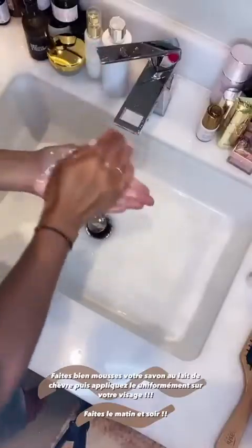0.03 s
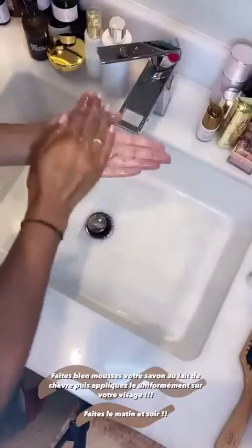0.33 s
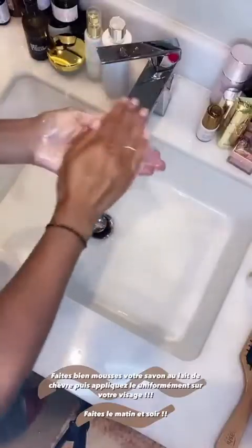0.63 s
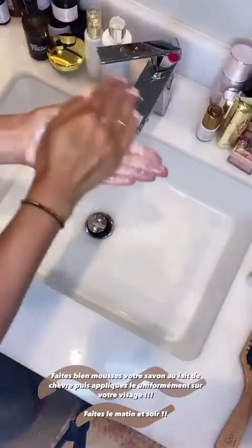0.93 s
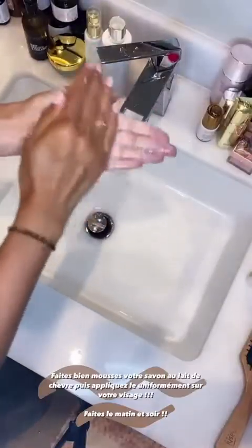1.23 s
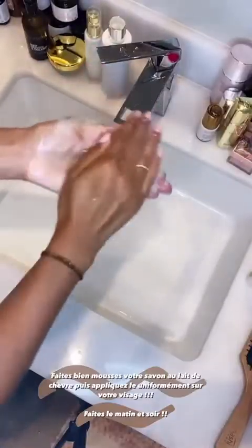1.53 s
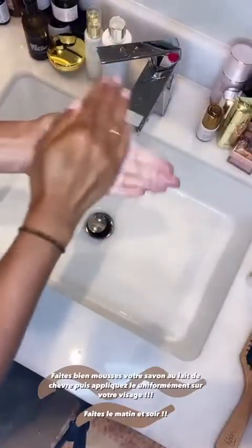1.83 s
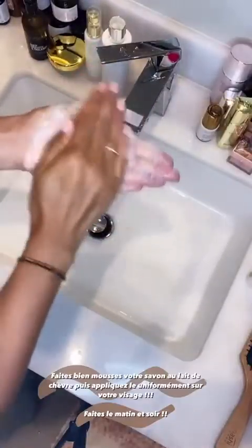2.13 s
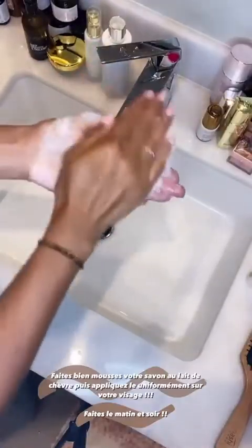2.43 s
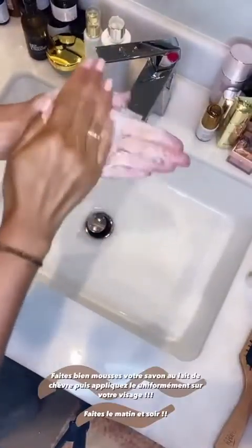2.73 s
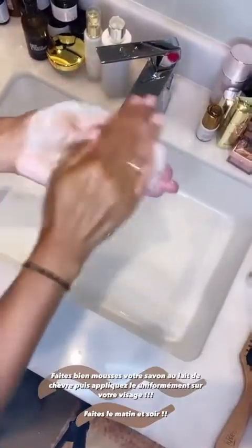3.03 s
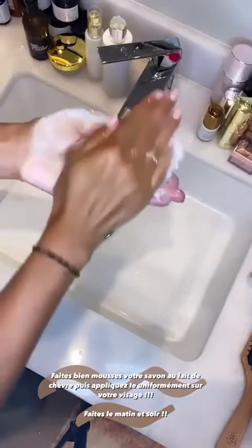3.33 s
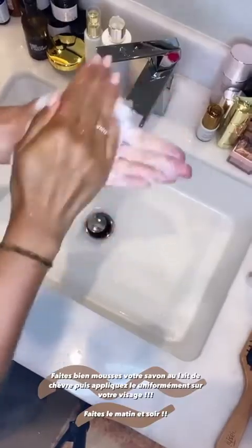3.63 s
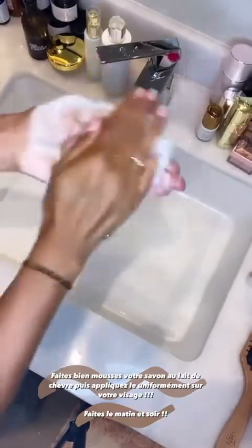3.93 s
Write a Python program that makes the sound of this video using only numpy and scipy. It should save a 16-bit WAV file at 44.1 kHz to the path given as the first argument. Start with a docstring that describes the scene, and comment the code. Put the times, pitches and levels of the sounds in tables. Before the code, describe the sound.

Wet, soapy hands rubbing together with quick squelches and crackling foam.

```python
"""Soapy hands rubbing over a bathroom sink, close to the microphone, about five strokes a second.
After a brief cut to silence the palms start to squelch, each stroke an air pocket gulping out through
crackling lather. In between, foam spits, bubbles pop and wet skin slides. The sound cuts out at 1.4 s,
the palms puff softly at 2.1 s, it cuts out again at 2.8 s, and air squeaks between the late strokes.
All along, the bowl and the hard little room ring over a low hum."""
import sys
import numpy as np
from scipy import signal
from scipy.fft import rfft, irfft, next_fast_len
from scipy.io import wavfile
from scipy.ndimage import map_coordinates

SR = 44100
rng = np.random.default_rng(int(sys.argv[2]) if len(sys.argv) > 2 else 0)


def wav_record(signal):
    """Record a signal, one row per channel, as 16-bit PCM in the file named by sys.argv[1]."""
    frames = np.transpose(np.atleast_2d(signal))
    bounded = np.clip(frames, -1, 1)
    # unit amplitude maps onto the largest positive 16-bit level
    quanta = np.round(bounded * 32767).astype(np.int16)
    wavfile.write(sys.argv[1], SR, quanta)


N = 176400
TOP_HZ, GRAINS_PER_S = 14100, 5000

# spectrum of coarse foam bursting (frequency [Hz], gain [dB])
CRACKLE_COLOUR = [(400, -24.5), (1000, -1), (1600, 1.5), (2800, 4.5), (4000, 4.5), (5000, -7), (6500, -4),
                  (12000, -69)]
# loudness of the rubbing skin (time [s], relative level [dB])
SLIDE_LEVEL = [(0, -48.5), (.3, -56), (.7, -58), (1.1, -60.5), (1.35, -60.5), (1.6, -57.5), (2.2, -50.5),
               (2.75, -50.5), (3.07, -48.5), (3.28, -54), (3.7, -53), (3.86, -46), (3.93, -55), (4, -46.5)]


def squelches():
    """Closing palms force out air at a rising pitch: gives the gulps and (crackle, fizz) envelopes."""
    # (time [s], rise [s], relative gulp [dB], pitch [Hz], relative crackle [dB], relative fizz [dB])
    strokes = [ (.187, 0.02, -34, 772, -35.5, -45), (.403, 0.018, -35.5, 800, -46.5, -49),
               (.605, 0.025, -34.5, 690, -42, -40), (.807, 0.018, -33, 747, -38.5, -42),
               (.998, 0.0111, -36, 700, -39, -47.5), (1.200, 0.0095, -36, 740, -42.5, -52),
               (1.400, 0.0089, -40.5, 1000, -38.5, -47), (1.516, 0.013, -34.5, 680, -41, -45.5),
               (1.712, 0.0073, -35, 603, -34.5, -45), (1.922, 0.009, -33, 930, -33, -37.5),
               (2.096, 0.0037, -38, 700, -40.5, -44), (2.119, 0.018, -36.5, 940, -35, -43.5),
               (2.301, 0.0062, -34, 890, -41, -41.5), (2.508, 0.0056, -33.5, 510, -45, -44.5),
               (2.712, 0.016, -32.5, 643, -41.5, -54.5), (3.020, 0.011, -32, 544, -39, -45.5),
               (3.222, 0.032, -37, 840, -53, -61.5), (3.626, 0.0053, -34, 897, -41, -48.5),
               (3.801, 0.013, -34.5, 637, -38, -45), (3.815, 0.0089, -40, 735, -39.5, -46.5),
               (3.996, 0.015, -33, 655, -37, -39)]
    # spectrum of the wet slush around a gulp (frequency [Hz], gain [dB])
    slush_colour = [(120, -49), (280, -12), (410, 0.5), (680, 2), (1080, -4), (1400, -4), (2200, -8.5),
                    (4000, -49.5), (8000, -94)]
    lag_s, glide_per_s, small_pocket_hz = 0.00215, 14.2, 1015
    tone, slush, crackle, fizz = np.zeros((4, N))
    for at, rise, gulp_db, hz, crackle_db, fizz_db in strokes:
        near = slice(max(0, int(at * SR) - SR // 8), int(at * SR) + SR // 4)
        t = clock()[near] - at
        gulp_t = t - lag_s
        phase = 2 * np.pi * (hz * (gulp_t + glide_per_s * gulp_t ** 2 / 2) + rng.random())
        pockets = np.sin(phase) + amp(-7) * np.sin(phase * small_pocket_hz / hz)
        tone[near] += amp(gulp_db) * swell(gulp_t, rise=0.0032, fall=0.0028) * pockets
        opening = np.clip((t + 1.1 * rise) / 0.0017, 0, 1)
        slush[near] += amp(gulp_db) * opening * swell(gulp_t, rise, fall=0.0084)
        crackle[near] += amp(crackle_db) * opening * swell(t, 0.68 * rise, fall=0.0046)
        lingering = amp(-15.5) * swell(t, rise=0.0014, fall=0.058)
        fizz[near] += amp(fizz_db) * opening * (swell(t, 0.38 * rise, fall=0.0046) + lingering)
    gulps = amp(-0.5) * tone + amp(-6) * slush * grains(slush_colour, GRAINS_PER_S, spread_db=3.5)
    return gulps, np.array([crackle, fizz])


def lather(crackle, fizz):
    """Coarse and fine foam burst under two envelopes; the top sparkle dulls as the soap thickens."""
    # spectra of fine foam and of thin, wet soap (frequency [Hz], gain [dB])
    fizz_colour = [(2000, -44), (4200, -4), (5100, -6.5), (5900, 1.5), (7500, -0.5), (9500, -7),
                   (12000, -13.5), (14000, -24)]
    sparkle_colour = [(5000, -31), (8000, 2), (11000, -1.5), (14000, -14.5)]
    dulling_db_per_s = 8
    sparkle = amp(-3 - dulling_db_per_s * clock()) * grains(sparkle_colour, GRAINS_PER_S, spread_db=9.5)
    coarse = amp(-4) * foam(CRACKLE_COLOUR, spread_db=10.5)
    fine = amp(-3) * foam(fizz_colour, spread_db=11)
    return crackle * coarse + fizz * (fine + sparkle)


def foam(colour, spread_db, bubbles_per_s=16000, ring_s=0.001):
    """A crowd of tiny bubbles, each ringing briefly at its own pitch, rms 1."""
    start, pitch, size, phase = rng.random((int(bubbles_per_s * N / SR), 4)).T[:, :, None]
    t = np.arange(SR // 500) / SR
    rings = amp(spread_db * size) * np.exp(-t / ring_s) * np.sin(2 * np.pi * (pitch * TOP_HZ * t + phase))
    at = (start * N).astype(int) + np.arange(len(t))
    crowd = np.bincount(at.ravel(), rings.ravel(), N)[:N]
    return unit(coloured(crowd, colour))


def grains(colour, per_s, spread_db):
    """Tiny soap films burst as clicks of random size, rms 1."""
    clicks = (rng.random(N) < per_s / SR) * rng.choice([-1, 1], N)
    sizes = amp(spread_db * rng.standard_normal(N))
    return unit(coloured(clicks * sizes, colour))


def spits():
    """(Crackle, fizz) envelopes of foam tearing between fingers: sudden start, short hold, quick end."""
    # (time [s], length [s], relative crackle [dB], relative fizz [dB])
    tears = [ (0.167, 0.0054, -45.5, -55.5), (0.572, 0.018, -50.5, -64.5), (0.6, 0.0036, -73, -47.5),
             (0.385, 0.0065, -44.5, -58.5), (0.818, 0.0058, -59.5, -41), (1.163, 0.0024, -43.5, -46.5),
             (1.694, 0.0044, -40, -36.5), (1.895, 0.006, -43.5, -49.5), (1.987, 0.0052, -41.5, -57),
             (2.085, 0.0059, -37, -52.5), (2.5, 0.002, -43, -47), (2.577, 0.0032, -43.5, -52),
             (2.694, 0.0027, -42.5, -38.5), (2.727, 0.016, -47, -45.5), (2.766, 0.01, -51.5, -46.5),
             (2.927, 0.008, -30.5, -42), (3.122, 0.005, -27.5, -39.5), (3.186, 0.0046, -41, -52),
             (3.206, 0.014, -42, -44), (3.237, 0.015, -46, -45), (3.411, 0.014, -46.5, -53),
             (3.438, 0.0031, -44.5, -37), (3.443, 0.011, -43, -45), (3.598, 0.0065, -44, -49.5),
             (3.694, 0.0031, -38.5, -40.5)]
    crackle, fizz = np.zeros((2, N))
    for at, length, crackle_db, fizz_db in tears:
        shape = np.interp((clock() - at) / length, [0, 0.1, 0.87, 1.83], [0.0013, 1, 0.76, 0.00034])
        crackle += amp(crackle_db) * shape
        fizz += amp(fizz_db) * shape
    return np.array([crackle, fizz])


def pops(tiny_count=90, tiny_hz=2990, glide_per_cycle=0.026):
    """A bubble opens with a snap and rings a few cycles, gliding upward. Tiny ones burst at random."""
    # single bubbles that stand out (time [s], peak [dB], pitch [Hz])
    bubbles = [ (.259, -40, 1143), (.467, -43, 1090), (.667, -38.5, 1080), (.936, -34, 3100),
               (1.07, -42.5, 1010), (1.390, -38.5, 3300), (1.600, -40.5, 1056), (1.800, -39, 2770),
               (2.192, -33.5, 4240), (2.409, -24.5, 2890), (2.480, -39.5, 2770), (2.659, -38.5, 3150),
               (2.932, -25, 2950), (3.313, -32, 3000), (3.392, -38.5, 1420), (3.416, -36.5, 3520),
               (3.517, -23.5, 2900)]
    slide_db = curve(SLIDE_LEVEL)
    tiny = [(i / SR, slide_db[i] + 1 + rng.normal(0, 2), tiny_hz * np.exp(rng.normal(0, 0.35)))
            for i in rng.integers(SR // 20, N - SR // 20, tiny_count)]
    ring, snap = np.zeros((2, N))
    for at, db, hz in list(bubbles) + tiny:
        near = slice(int(at * SR) - SR // 100, int(at * SR) + SR // 50)
        t = np.arange(near.start, near.stop) / SR - at
        cycles = t * hz
        phase = 2 * np.pi * (cycles + glide_per_cycle * cycles ** 2 / 2 + rng.random())
        ring[near] += amp(db) * swell(cycles, rise=1.8, fall=1.5) * np.sin(phase)
        snap[near] += amp(db - 14) * swell(t, rise=0.0017, fall=0.0026)
    return ring + snap * grains(CRACKLE_COLOUR, GRAINS_PER_S, spread_db=-1)


def chirps():
    """Air squeaks through a wet gap: a short gliding note that flutters with the soap film."""
    # (time [s], half length [s], peak [dB], pitch [Hz], glide [octaves/s])
    squeaks = [ (0.1734, 0.0026, -31.5, 4046, 0), (0.448, 0.003, -40, 11550, 1),
               (0.527, 0.0033, -44.5, 12070, -6), (0.596, 0.0094, -41, 3760, -0.5),
               (.728, .003, -53.5, 11900, -3), (3.199, 0.0035, -39, 1645, -27.5),
               (3.245, 0.0072, -33.5, 2693, 7), (3.292, 0.0079, -42.5, 4087, 12),
               (3.445, 0.012, -44.5, 1750, 17.5), (3.608, 0.0095, -44.5, 2498, -17)]
    out = np.zeros(N)
    for at, half, db, hz, glide in squeaks:
        near = slice(int(at * SR) - SR // 20, int(at * SR) + SR // 20)
        t = clock()[near] - at
        phase = 2 * np.pi * np.cumsum(hz * 2 ** (glide * t)) / SR
        flutter = wobble(hz / 2)[near]
        out[near] += amp(db) * np.exp(-(t / half) ** 2) * np.sin(phase + flutter)
    return out


def thump(at_s=2.141, hz=77):
    """One soft, low puff of air as the palms cup."""
    # (frequency [Hz], gain [dB])
    puff_colour = [(10, -34), (28, -1), (70, -6.5), (170, -5.5), (240, -23), (500, -35.5), (1500, -100)]
    t = clock() - at_s
    puff = 1.43 * grains(puff_colour, GRAINS_PER_S, spread_db=0)
    push = 0.53 * np.cos(2 * np.pi * hz * t)
    return amp(-36) * swell(t, rise=0.0079, fall=0.012) * (push + puff)


def slide():
    """Wet skin slides on a film of small bubbles, in uneven clumps."""
    # spectrum of skin on skin (frequency [Hz], gain [dB])
    skin_colour = [(100, -15), (250, 4.5), (600, 1.5), (1100, 2), (1800, -3), (3500, -5), (5100, -10),
                   (6200, -17), (13500, -27)]
    clumps = amp(4.4 * wobble(90))
    return amp(curve(SLIDE_LEVEL) - 6) * unit(clumps * grains(skin_colour, per_s=4000, spread_db=6))


def ticks(per_s=57, length_s=0.0078):
    """(Crackle, fizz) envelopes of small clusters of foam that burst at random all the while."""
    starts = rng.random((2, N)) < per_s / SR
    sizes = amp(4.5 * np.clip(rng.standard_normal((2, N)), -2, 2))
    age = np.arange(SR // 20) / SR / length_s
    power = signal.fftconvolve((starts * sizes) ** 2, np.exp(-2 * age ** 2)[None], axes=1)[:, :N]
    crackle, fizz = np.sqrt(np.abs(power))
    return np.array([amp(-65.5) * crackle, amp(-60) * fizz])


def sink(x, t60_s=0.31):
    """The bowl under the hands rings on at its own two pitches."""
    # (pitch [Hz], relative level [dB])
    bowl_modes = [(1080, -27.5), (1425, -24.5)]
    t = np.arange(SR // 2) / SR
    fade = amp(-60 * t / t60_s)
    ring = sum(amp(db) * np.cos(2 * np.pi * hz * t) for hz, db in bowl_modes)
    return signal.fftconvolve(x, ring * fade / np.linalg.norm(fade))[:N]


def echo(x, t60s):
    """Diffuse reflections, each frequency dying at its own speed; a new tail every 0.2 s evens the tone."""
    out, step = np.zeros(N + SR), SR // 5
    for start in range(0, N, step):
        hz, t, noise = signal.stft(rng.standard_normal(SR // 2), SR, nperseg=256)
        fade = amp(-60 * t / along(t60s, hz)[:, None])
        tail = signal.istft(noise * fade, SR, nperseg=256)[1]
        answer = signal.fftconvolve(x[start:start + step], tail / np.linalg.norm(tail))
        out[start:start + len(answer)] += answer
    return out[:N]


def hum(hz=69.8, drift_rad=0.34):
    """Room tone behind the hands: a low, wavering hum over a steady rumble."""
    # swells of the hum (time [s], relative level [dB])
    hum_level = [(.13, -43.5), (.42, -47.5), (.56, -40.5), (1.0, -56), (1.11, -39.5), (1.55, -46),
                 (1.76, -46.5), (1.86, -40), (2.03, -47), (2.17, -45.5), (2.36, -57), (2.44, -44),
                 (2.6, -50.5), (2.95, -44.5), (3.55, -42.5), (4, -44.5)]
    # spectra of the noise around the hum and of the rumble (frequency [Hz], gain [dB])
    band_colour = [(35, -43.5), (55, 4), (68, -2.5), (80, 4.5), (105, -39.5), (300, -120)]
    rumble_colour = [(25, -18), (50, -7.5), (95, 0.5), (170, -12.5), (260, -10), (400, -21.5), (1000, -46),
                     (12000, -88)]
    tone = np.sqrt(2) * np.sin(2 * np.pi * hz * clock() + drift_rad * wobble(6.25))
    band = unit(coloured(rng.standard_normal(N), band_colour))
    rumble = unit(coloured(rng.standard_normal(N), rumble_colour))
    return amp(curve(hum_level)) * (amp(-3) * tone + amp(-9.5) * band) + amp(-55) * rumble


def amp(db):
    """Decibels to gain."""
    return 10 ** (np.asarray(db) / 20)


def unit(x):
    """x scaled to rms 1."""
    return x / np.sqrt(np.mean(x ** 2) + 1e-20)


def along(points, hz):
    """(frequency [Hz], value) points read at hz on a log axis."""
    knots_hz, values = np.transpose(points)
    return np.interp(np.log(hz + 1), np.log(knots_hz + 1), values)


def clock():
    """The time of each sample in seconds."""
    return np.arange(N) / SR


def curve(rows):
    """(time [s], value) rows joined by straight lines."""
    return np.interp(clock(), *np.transpose(rows))


def wobble(rate):
    """A smooth random curve, rate knots a second."""
    return map_coordinates(rng.standard_normal(int(N * rate / SR) + 4), [clock() * rate])


def swell(t, rise, fall):
    """Exponential growth up to t = 0, exponential decay after it."""
    return np.exp(-np.minimum(np.where(t < 0, -t / rise, t / fall), 30))


def coloured(x, points):
    """x through a causal filter shaped by (frequency [Hz], gain [dB]) points."""
    size = 2 * next_fast_len(N // 2 + 8192)
    gain = amp(along(points, np.fft.rfftfreq(size, 1 / SR)))
    cepstrum = irfft(np.log(gain), size)
    cepstrum[1:size // 2] *= 2  # folded onto positive time for minimum phase
    cepstrum[size // 2 + 1:] = 0
    return irfft(rfft(x, size) * np.exp(rfft(cepstrum)), size)[:N]


def scene():
    """Hands close up in the centre of the stereo image; the soft treble sounds wide."""
    # decay of the reflections (frequency [Hz], time to fall 60 dB [s])
    room_t60 = [(200, .9), (800, 0.5), (2000, 0.5), (6000, 0.33)]
    basin_t60 = [(1000, 0.032)]
    # spectra of the walls' answer and of the side channel (frequency [Hz], gain [dB])
    wall_colour = [(480, -3.5), (1200, 0.5)]
    side_colour = [(3900, -60), (4800, -13), (6000, -9), (7000, -6)]
    gulps, squeezed = squelches()
    rubbing = slide()
    notes = chirps() + pops()
    crackle, fizz = np.sqrt(squeezed ** 2 + spits() ** 2 + ticks() ** 2)  # envelopes add in power
    hands = gulps + lather(crackle, fizz) + notes + thump() + rubbing
    to_walls = amp(-7) * coloured(hands - notes / 2, wall_colour)  # pops and chirps stay drier
    mid = hands + sink(hands) + amp(-18) * echo(hands, basin_t60) + echo(to_walls, room_t60) + hum()
    decorrelated = echo(0.75 * hands + 0.6 * rubbing, basin_t60) + echo(to_walls, room_t60)
    side = coloured(decorrelated, side_colour)
    return np.array([mid + side, mid - side])


def record(dry):
    """The microphone signal cuts to silence three times; nothing is kept above TOP_HZ."""
    # silent gaps (start [s], end [s])
    dropouts = [(.0172, .1223), (1.4037, 1.5137), (2.7941, 2.9031)]
    t = clock()
    live = 1 - sum((t > start) & (t < end) for start, end in dropouts)
    size = next_fast_len(N + SR // 2)
    passband = np.fft.rfftfreq(size, 1 / SR) < TOP_HZ
    return irfft(rfft(dry * live, size) * passband, size)[:, :N]


dry = scene()
out = record(dry)
wav_record(out)
```